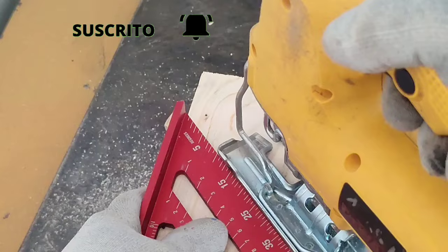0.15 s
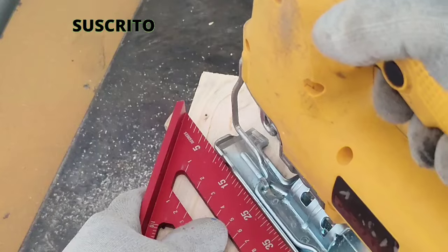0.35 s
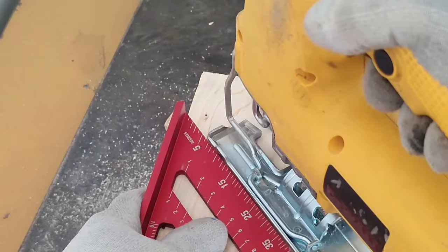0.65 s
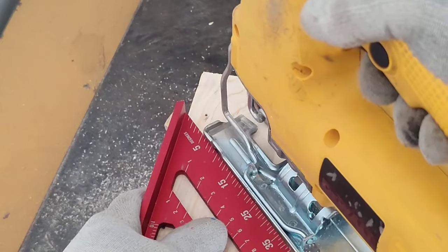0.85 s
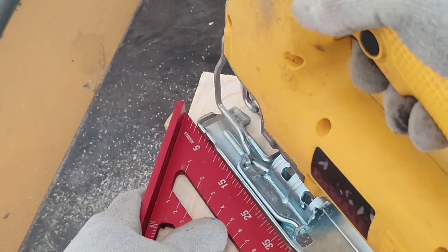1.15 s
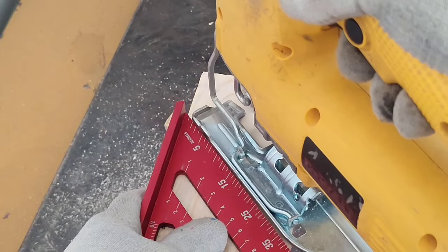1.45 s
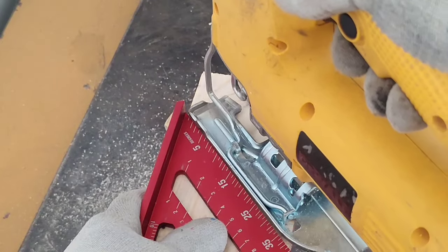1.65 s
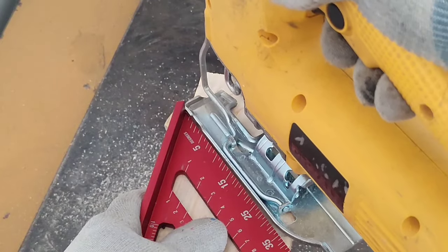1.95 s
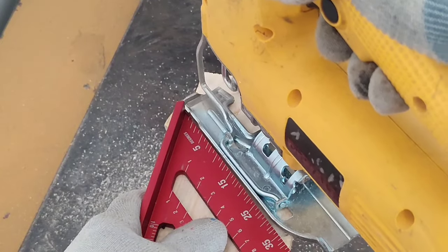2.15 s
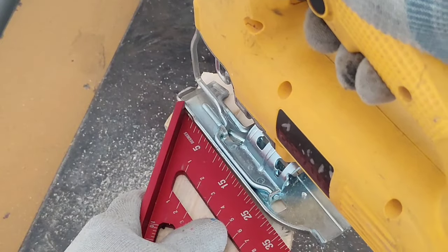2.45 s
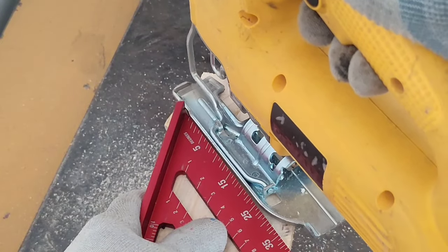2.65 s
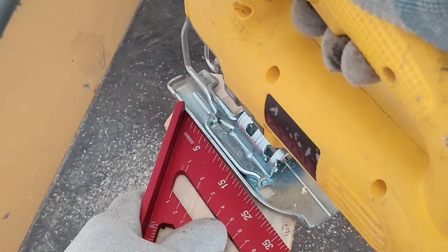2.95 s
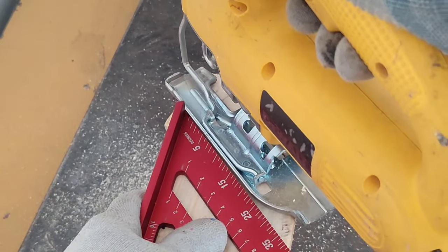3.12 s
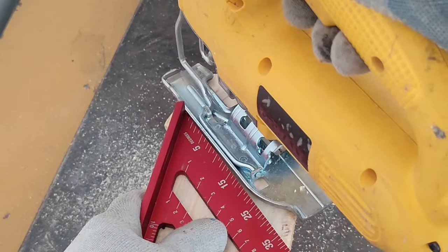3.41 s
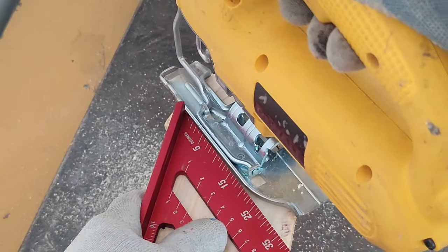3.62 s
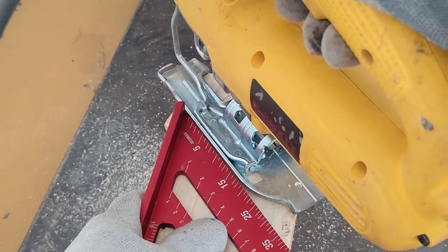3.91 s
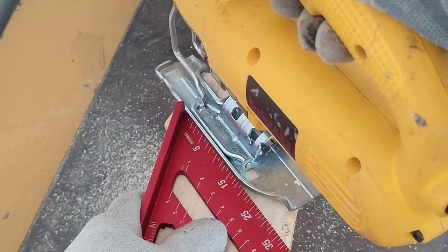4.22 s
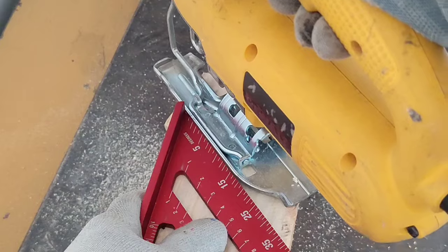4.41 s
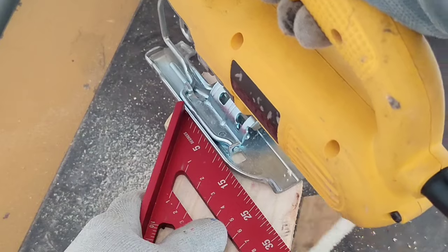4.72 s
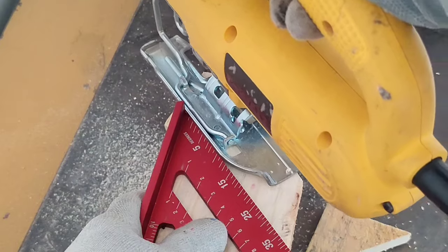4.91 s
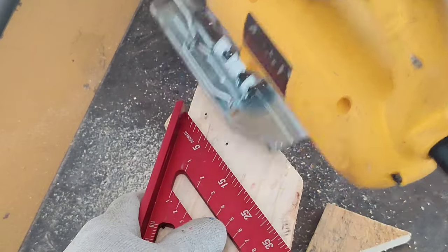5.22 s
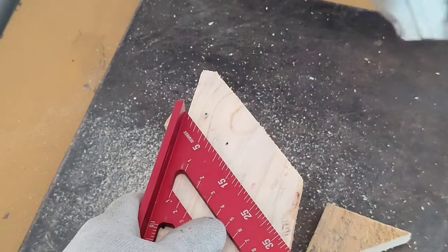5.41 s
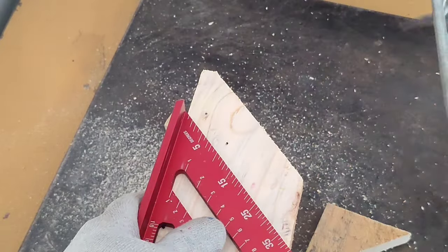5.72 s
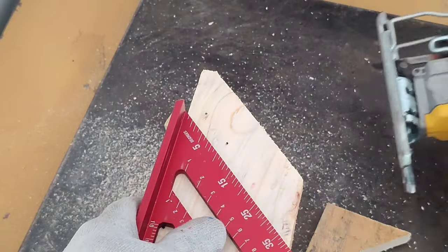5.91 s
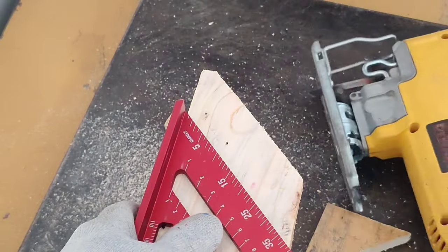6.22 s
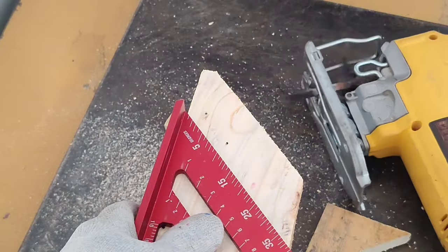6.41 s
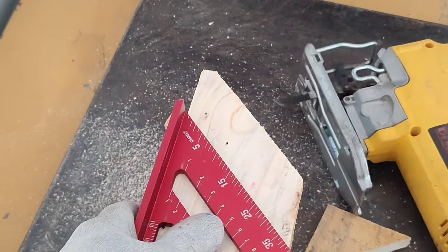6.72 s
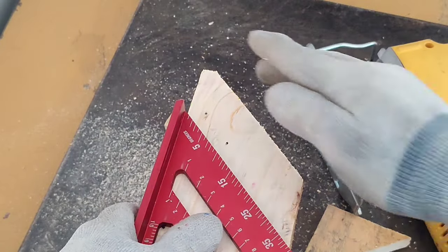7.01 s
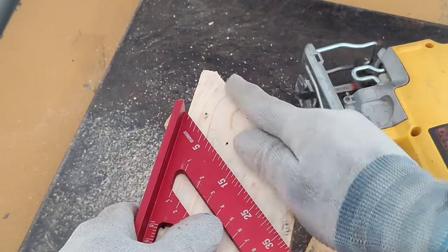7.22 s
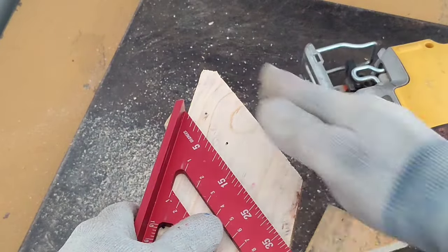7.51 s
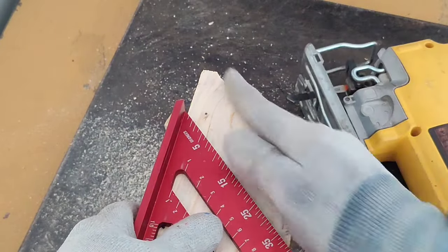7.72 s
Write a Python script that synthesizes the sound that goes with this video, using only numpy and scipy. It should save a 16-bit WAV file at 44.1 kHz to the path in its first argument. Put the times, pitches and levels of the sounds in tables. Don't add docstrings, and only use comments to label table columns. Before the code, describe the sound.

Very close to the microphone, a jigsaw tears through a wooden board with a harsh, rapid hammering buzz, motor whine, gear rattle and fan hiss. Dry snaps crowd in as the board thins. The blade breaks free, the motor is switched off and its whine slides down while moving right. The saw thumps onto the bench, its last rattle dies, and a gloved hand brushes the board in a quiet small workshop.

```python
import sys
import numpy as np
from scipy import signal
from scipy.fft import rfft, irfft, next_fast_len
from scipy.io import wavfile
from scipy.ndimage import uniform_filter1d, map_coordinates

SR = 44100
rng = np.random.default_rng(int(sys.argv[2]) if len(sys.argv) > 2 else 0)


def gain_from_db(level_db):
    decades = np.asarray(level_db, float) / 20
    return 10 ** decades


def transcribe(signal):
    frames = np.atleast_2d(signal).T
    limited = np.clip(frames, -1, 1)
    pcm = np.round(limited * 32767).astype(np.int16)
    wavfile.write(sys.argv[1], SR, pcm)


N = 346255
TIME = np.arange(N) / SR
GEAR = 9.55
SWITCH_OFF_S = 5.1


def unit(x):
    return x / np.sqrt(np.mean(x ** 2) + 1e-20)


def along(points, hz):
    f, v = np.transpose(points)
    return np.interp(np.log(hz + 1), np.log(f + 1), v)


def curves(rows):
    s, *cols = np.transpose(rows)
    return [np.interp(TIME, s, c) for c in cols]


def wobble(rate):
    knots = rng.standard_normal(int(N * rate / SR) + 4)
    return map_coordinates(knots, [np.arange(N) * rate / SR])


def filtered(x, response):
    m = next_fast_len(N + SR // 4)
    return irfft(rfft(x, m) * response(np.fft.rfftfreq(m, 1 / SR)), m)[..., :N]


def highpass(x, hz, order):
    return filtered(x, lambda f: f ** order / (f ** order + float(hz) ** order))


def resonances(modes):
    def mode(f, centre, width):
        return 1j * f * width / (centre * centre - f * f + 1j * f * width)
    return lambda f: sum((-1) ** k * gain_from_db(db) * mode(f, c, w) for k, (c, w, db) in enumerate(modes))


def ticks(turns, scatter_db):
    at = np.flatnonzero(np.diff(np.floor(turns)))
    train = np.zeros(N)
    train[at] = gain_from_db(scatter_db * rng.standard_normal(N)[:len(at)])
    return train


def ring(hz, db, width_hz, gate=1, steady=0, apart=1):
    both, left, right = [wobble(width_hz) + 1j * wobble(width_hz) for port in range(3)]
    drift = np.cumsum(width_hz * wobble(width_hz)) / SR
    both = both + steady * np.exp(1j * drift)
    carrier = gate * np.exp(2j * np.pi * np.cumsum(hz + np.zeros(N)) / SR)
    return gain_from_db(db) * unit(np.real(carrier * [both + 0.91 * apart * left, both + 0.76 * apart * right]))


def spells(rows, rest_db, fall_db_per_s):
    total = gain_from_db(rest_db)
    for start, attack, hold, db in rows:
        rise = np.clip((TIME - start) / attack, 0, 1) ** 2
        fall = gain_from_db(-fall_db_per_s * np.clip(TIME - start - attack - hold, 0, 9))
        total = total + gain_from_db(db) * rise * fall
    return 20 * np.log10(total)


# f/Hz, likeness [0-1]
ALIKE = [(100, 0.88), (300, 0.91), (600, 0.3), (1200, 0.24), (2500, 0.23), (5000, 0.33), (9000, 0.36),
         (13000, 0.17)]


def rush(spectrum, gate, patchy_db=0):
    z = signal.stft(gate * rng.standard_normal((2, N)), nperseg=1024)[2]
    field = uniform_filter1d(uniform_filter1d(rng.standard_normal(z.shape[1:]), 4, 0), 14, 1)
    pair = signal.istft(z * gain_from_db(patchy_db * unit(field)), nperseg=1024)[1][:, :N]

    def response(hz):
        turn = np.arccos(np.clip(along(ALIKE, hz), 0, 1)) / 2
        return gain_from_db(along(spectrum, hz)) * [np.cos(turn), np.sin(turn)]
    mid, side = filtered(pair, response)
    return unit(np.array([mid + side, mid - side]))


# t/s, share [0-1]
AWAY = [
    (0, 0),
    (5.15, 0),
    (5.6, 0.89),
    (7.85, 0.85),
]


def away():
    return curves(AWAY)[0]


# t/s, f/Hz
SPEED = [(0, 490.2), (.2, 496.8), (.4, 502.5), (1, 508.5), (1.6, 516), (1.8, 517.1), (2.07, 522.3),
         (2.25, 523.6), (2.5, 522.3), (2.85, 516.8), (3.1, 518.4), (3.6, 527.9), (4.2, 533.6), (4.55, 533),
         (4.8, 545.4), (5, 552.3), (5.085, 553.2)]


def shaft():
    drag_s, friction_hz = 2.8, 400
    coasting = np.clip(TIME - SWITCH_OFF_S, 0, None)
    return np.clip((curves(SPEED)[0] + friction_hz) * np.exp(-coasting / drag_s) - friction_hz, 0, None)


# t/s, level/dB
FEED = [(0, 0), (.4, -2), (.9, -2.5), (1.3, -1), (1.8, -2), (2.1, -1), (2.6, -1.5), (2.85, -1), (3.6, -1.5),
        (3.9, -8.5), (4.4, -3), (4.65, -2), (4.95, -1.5), (5.1, -5.5), (5.3, -0.5), (5.6, 3)]
# t/s,
# change level/dB, half length t/s
SNAGS = [(.41, 0.5, 0.027), (0.762, 0, .03), (0.851, 0.5, .04), (1.035, -1.5, 0.027), (1.178, -6.5, 0.014),
         (1.835, 2.5, 0.017), (1.893, 1.5, 0.024), (2.3, 0.5, 0.03), (2.455, -3.5, .03),
         (2.777, -3.5, 0.066), (3.89, 5.5, 0.013), (4, -16, 0.016), (4.078, 4.5, 0.041), (4.13, -2, 0.024),
         (4.236, -2.5, 0.019), (4.3, 3.5, 0.018), (4.412, 1, 0.032), (4.545, -4.5, 0.036),
         (4.58, 11.5, .01), (4.613, -10.5, 0.033), (4.72, 2, 0.036), (5.86, 0, 0.026),
         (6.642, 11.5, 0.0303), (7.317, -9, 0.047)]


def feed():
    return curves(FEED)[0] + sum(db * np.exp(-((TIME - s) / half) ** 2) for s, db, half in SNAGS)


# from t/s, delay as share of a stroke
BEAT_DELAYS = [(0, .06), (2.1, -.1), (2.88, .2), (3.25, -.3), (3.45, -.35), (3.59, .08), (3.655, -.4), (3.825, 0),
               (3.91, -.05), (4.02, .44), (4.125, .85), (4.25, .77), (4.36, .72)]


def beat_delay():
    s, share = np.transpose(BEAT_DELAYS)
    return share[np.searchsorted(s, TIME, side="right") - 1]


# f/Hz, level/dB per Hz
ROOM = [(120, -34), (200, -4), (373, -4.5), (454, -11), (1130, -24.5), (1320, -20), (4360, -31),
        (14200, -28.5)]
# f/Hz, level/dB per Hz
HISS = [(300, -31.5), (1500, -7), (4000, -1), (9000, 0), (12000, -11.5), (14200, -21)]


def workshop():
    return gain_from_db(-61.5) * rush(ROOM, 1) + gain_from_db(-72) * rush(HISS, 1)


# f/Hz, level/dB per Hz
DEEP = [(15, -32), (30, -3.5), (70, -2), (160, -4.5), (260, -7.5), (400, -36), (800, -120)]
# start t/s, swell t/s, hold t/s, level/dB
SHUDDERS = [(-.1, .1, 3.48, -40), (3.6, 0.094, .9, -52), (4.6, 0.11, 0.4, -42), (5.4, 0.046, 0.12, -49),
            (5.83, .03, .02, -64), (5.93, .02, .02, -60), (6.15, 0.041, 0.39, -59), (6.6, 0.034, 0.14, -45),
            (6.9, .05, .2, -56), (7.2, 0.12, 0.11, -59), (7.7, 0.17, .1, -68)]


def bench_rumble():
    level_db = spells(SHUDDERS, -72, 70) - 1.0 + 1.4 * wobble(10) + 0.9 * wobble(2.27)
    return gain_from_db(level_db) * rush(DEEP, 1)


# f/Hz, level/dB per Hz
CLOTH = [(59, -30.5), (100, -9), (168, -31), (249, -12), (500, -16), (845, -21), (1110, -12.5), (3250, -22),
         (8970, -27), (11500, -27.5), (12800, -27), (14200, -39)]
# start t/s, swell t/s, hold t/s, level/dB
GLOVE = [
    (7.33, .05, .07, -39),
    (7.47, .03, .04, -57),
    (7.72, .04, 0, -58),
    (7.762, .002, .2, -44.5),
]


def gloved_hand():
    return gain_from_db(spells(GLOVE, -76, 200)) * rush(CLOTH, gain_from_db(1.9 * wobble(260)))


# t/s, peak level/dB
LAID = [
    (6.621, -20),
    (6.639, -28),
    (6.687, -30),
    (6.75, -40),
]
# f/Hz, level/dB, time to fall 60 dB t/s
BENCH = [(67.3, -4.5, 1), (122.6, -6, 0.42), (204, -12.5, 0.53), (342, -10, 0.27), (450, -13, .15),
         (556, -7, 0.12), (960, -17, 0.13), (1100, -4, 0.55), (1330, -6, 0.28)]


def laid_down():
    out, t = np.zeros(N + SR), np.arange(SR) / SR
    for s, db in LAID:
        modes = sum(gain_from_db(level + rng.normal(0, 2.7) - 60 * t / t60) * np.sin(2 * np.pi * hz * t)
                    for hz, level, t60 in BENCH)
        puff = 3 * uniform_filter1d(rng.standard_normal(SR), 20) * gain_from_db(-60 * t / 0.17)
        out[round(s * SR):][:SR] += gain_from_db(db - 8.0) * (modes + puff) * (1 - np.exp(-t / 0.0017))
    return out[:N]


# start t/s, swell t/s, hold t/s, level/dB
ONCE = [
    (.05, .2, 0.038, -62),
    (.9, .7, 1.75, -49.5),
]
# start t/s, swell t/s, hold t/s, level/dB
TWICE = [(-.1, 0.075, 2.3, -39.5), (2.3, 0.051, .95, -43), (3.35, .06, .55, -54), (4, .06, 0.53, -48.5),
         (4.5, 0.24, 0.09, -37.5), (4.75, 0.22, 0.24, -27.5), (5.36, 0.035, .04, -43.5)]


def shake(speed):
    off = round(SWITCH_OFF_S * SR)
    strokes = np.cumsum(np.where(np.arange(N) < off, speed, speed[off])) / SR / GEAR
    once_db, twice_db = spells(ONCE, -53.5, 25), spells(TWICE, -59, 170)
    once = gain_from_db(once_db + 3 * wobble(11)) * np.sin(2 * np.pi * (strokes + 0.088 * wobble(12)))
    twice = gain_from_db(twice_db + 1.5 * wobble(15)) * np.sin(2 * np.pi * (2 * strokes + 0.093 * wobble(12)))
    return 1.32 * (once + twice) * gain_from_db(-60 * np.clip(TIME - 5.4, 0, None))


# order, start t/s, swell t/s, hold t/s, level/dB
DRONES = [(4, -.1, .1, .38, -36), (4, .4, .1, 1.5, -46), (5, .9, .3, 1.2, -43), (5, 2.7, .1, .45, -41),
          (6, -.1, .1, .5, -37), (6, .6, .1, .5, -46), (8, .2, .1, .4, -44), (8, 1.7, .1, .35, -45),
          (8, 3.4, .1, .25, -44), (9, 2.3, .2, .7, -39), (11, .1, .1, .6, -37), (11, 1., .1, .9, -36.5),
          (11, 2.7, .1, .3, -42), (13, 2.6, .1, .4, -42), (10, 3.1, .1, 1.3, -40)]


def drones(strokes):
    total = 0
    for order, *spell in DRONES:
        level = gain_from_db(spells([spell], -90, 90) + 2 * wobble(9))
        total = total + level * np.sin(2 * np.pi * (order * strokes + .05 * wobble(14)))
    return 1.4 * total


def slowing(speed):
    return np.log10(speed / 520 + .03)


def halt_db():
    return -200 * np.clip(TIME - 7.43, 0, None)


def freed():
    return np.clip((TIME - 4.62) / 0.055, 0, 1)


def flutter_db():
    return 1.6 * away() * wobble(16)


def clear_db():
    return 3.5 * away()


# order, level/dB, line width f/Hz
WHINE = [(11.87, -42, -7.5), (15.52, -38.5, 60.5), (23.8, -41.5, 159.5)]


def armature(speed, turns):
    def tone(order, db, hz):
        return 1.74 * gain_from_db(db) * np.sin(2 * np.pi * (order * turns + np.cumsum(hz * wobble(300)) / SR))
    hum_db = -49 + 18 * slowing(speed)
    hum_db += 8 * np.exp(-((speed - 340) / 45) ** 2)
    hum_db -= np.clip((295 - speed) / 5, 0, 9)
    tones = tone(1, hum_db - 3 + 2.5 * wobble(20), 14 - 5 * away())
    effort_db = 40 * np.log10(speed / 520 + .01)
    tones += sum(tone(order, db + effort_db + 3 * wobble(23), hz) for order, db, hz in WHINE)
    return tones * gain_from_db(halt_db())


# t/s, tone level/dB at full speed
VENTS = [(0, -28), (.45, -21), (.8, -30.5), (1.15, -24), (1.5, -21.5), (2, -24), (2.6, -27.5), (3.4, -27),
         (3.65, -32.5), (4.4, -29.5), (5.05, -25.5), (5.2, -24), (5.45, -21.5), (5.57, -20), (5.63, -34)]


def fan_whine(speed, strokes):
    level_db = curves(VENTS)[0] + 40 * slowing(speed) + 0.61 * wobble(2.7) + flutter_db()
    pitch_hz = 17 * speed + 70 * away() * wobble(50)
    load = gain_from_db(2.2 * np.cos(2 * np.pi * strokes))
    return ring(pitch_hz, level_db - 1.5 + clear_db(), 40, load, steady=1.5, apart=2)


# start t/s, swell t/s, hold t/s, level/dB
MESH = [(-.05, .05, .2, -25.5), (.2, .04, .15, -31), (3.4, .1, .9, -35), (4.66, .05, .15, -32),
        (5.28, .06, .08, -28), (5.44, .05, .07, -31), (5.57, .03, .05, -26), (5.7, .04, .08, -31),
        (5.81, .03, .03, -21), (5.92, .03, .03, -24), (6.02, .04, .3, -27)]


def pinion(speed, strokes):
    level_db = spells(MESH, -53, 97) + 37 * slowing(speed) + 1.5 * wobble(7.3) + flutter_db()
    pitch_hz = 8 * speed + 40 * away() * wobble(30)
    load = gain_from_db(5 * np.cos(2 * np.pi * strokes + 2))
    return ring(pitch_hz, level_db + clear_db(), 120, load, steady=1)


# f/Hz, level/dB per Hz
RATTLE = [(180, -29.5), (300, -21.5), (362, -15), (437, -19.5), (566, -16), (876, -10), (1070, -4),
          (1220, -8), (1560, -4.5), (2410, -1.5), (2680, -3.5), (2910, -5), (3860, -11.5), (5000, -13.5),
          (6500, -60), (11000, -120)]


def gear_rattle(speed, lumps):
    level_db = -19.5 + 0.33 * feed() + 15.7 * slowing(speed) - 0.5 * freed() + halt_db()
    return gain_from_db(level_db) * rush(RATTLE, lumps, patchy_db=2.0)


# f/Hz, level/dB per Hz
AIR = [(1760, -20.5), (3000, -2.5), (4340, -1), (5450, -4.5), (5970, -3), (6580, -2), (7590, 2.5),
       (8530, -7), (9100, -6), (9590, -8.5), (9840, -4.5), (13000, -5), (14200, -10)]


def fan_air(speed):
    level_db = -25 + 0.34 * feed() + 24.3 * slowing(speed) + 2.5 * freed() + halt_db()
    level_db += 3.5 * np.exp(-((TIME - 5.46) / 0.082) ** 2)
    gusts = gain_from_db(0.18 * wobble(12) + 1.3 * wobble(40) + 1.26 * wobble(500))
    air = gain_from_db(level_db + 7.0) * rush(AIR, gusts, patchy_db=1.5)
    top = highpass(air, 7900, 4)
    return air - top + top * gain_from_db(2.7 * slowing(speed))


# start t/s, swell t/s, hold t/s, level/dB
SHELL_RINGS = [
    (5.3, 0.073, 0.044, -3),
    (5.9, 0.53, .85, -16.5),
    (7.05, 0.13, .1, -45),
    (7.3, 0.04, 0.086, -36),
]
# start t/s, swell t/s, hold t/s, level/dB
BENCH_RINGS = [
    (6.62, 0.026, 0.21, -36),
    (7.1, 0.043, .04, -38),
]
# start t/s, swell t/s, hold t/s, level/dB
CASE_RINGS = [
    (5.7, .1, .2, -33),
    (6.65, .1, 0.22, -37),
    (7.15, 0.049, 0.16, -55),
]


def shell(speed, lumps):
    pitch_hz = 2250 + 0.9 * np.clip(speed - 100, 0, 250)
    shell_db = spells(SHELL_RINGS, -74, 120) - 14.0 + halt_db()
    rings = np.clip(1.7 - speed / 330, 0, 1) * ring(pitch_hz + 40 * wobble(25), shell_db, 750, lumps, steady=.4)
    seated = np.arange(N) > 6.62 * SR
    rings += seated * ring(1065, spells(BENCH_RINGS, -79, 90) - 4.0 + halt_db(), 90)
    case_db = spells(CASE_RINGS, -72.5, 80) + halt_db()
    return rings + ring(3200 + 90 * wobble(6.5), case_db, 450, lumps)


def motor_noise(speed, strokes):
    lumps = gain_from_db(1.0 * np.cos(4 * np.pi * strokes) * speed / 520 + 0.85 * wobble(30) + 1.7 * wobble(400))
    noise = gear_rattle(speed, lumps) + fan_air(speed) + shell(speed, lumps)
    noise += pinion(speed, strokes) + fan_whine(speed, strokes)
    return highpass(noise, 214, 6)


# t/s, peak level/dB
CRACKS = [(2.3017, -8), (2.3372, -8), (2.4101, -6), (2.5372, -8), (2.5555, -8), (2.5739, -9), (2.5927, -9),
          (2.6299, -7), (2.6486, -9), (2.7026, -8), (2.72, -10), (2.7648, -11), (2.7847, -10), (2.8314, -9),
          (2.8527, -10), (2.9116, -8), (2.9292, -9), (2.9531, -9), (3.0794, -10), (3.1555, -10),
          (3.1693, -10), (3.1881, -8), (3.3251, -10), (3.393, -9), (3.5243, -6), (3.5428, -8), (3.5792, -7),
          (3.6047, -7), (3.6229, -7), (3.6411, -8), (3.6683, -6), (3.7045, -7), (3.7232, -8), (3.758, -7),
          (3.776, -10), (3.7944, -11), (3.8128, -7), (3.8379, -12), (3.874, -9), (3.8921, -7), (3.9268, -9),
          (3.9453, -9), (3.9586, -9), (4.0447, -8), (4.0593, -9), (4.0796, -9), (4.097, -10), (4.1584, -10),
          (4.1765, -10), (4.1942, -11), (4.3004, -8), (4.389, -10), (4.4718, -8), (4.5722, -8)]
# f/Hz, width f/Hz, level/dB
CRACKED = [(540, 150, 0), (1050, 400, -8), (1530, 500, 0), (2900, 800, -4), (4250, 1200, -8)]


def cracks():
    s, db = np.transpose(CRACKS)
    train = np.zeros(N)
    train[np.round(s * SR).astype(int)] = gain_from_db(db - 1)
    snap = filtered(train, resonances(CRACKED))
    return -snap * train.max() / np.abs(snap).max()


# start t/s, swell t/s, hold t/s, level/dB
KNOCKS = [
    (0, 0.34, 0.11, -35),
    (2.6, 0.36, 1, -63.5),
    (4.9, .3, .02, -54),
]
# f/Hz, width f/Hz, level/dB
BOARD = [(553, 90, -9), (810, 60, -5.5), (992, 58, -3.5), (1247, 65, 0.5), (1540, 140, -5),
         (2095, 170, -3.5), (2860, 125, -3), (4286, 200, -5.5)]
# start t/s, swell t/s, hold t/s, level/dB
SLAPS = [
    (2.4, 0.3, .5, -35.5),
    (3.1, 0.15, 1.22, -34.5),
    (4.95, 0.079, 0.11, -35.5),
]
# f/Hz, width f/Hz, level/dB
SLAPPED = [(530, 130, 4), (1520, 400, -5), (330, 60, -6), (2850, 500, -10)]
# start t/s, swell t/s, hold t/s, level/dB
THUMPS = [
    (0, 0.051, 0.22, -39),
    (.5, 0.098, 2.57, -43),
    (2.8, 0.1, .15, -45.5),
    (3.2, .2, 1.2, -58.5),
]
# f/Hz, width f/Hz, level/dB
BENCH_LOW = [(205, 210, 4), (274.3, 74, 16), (419, 51, 3.5)]


def blade_knock(strokes):
    blows = ticks(strokes + 0.0086 * wobble(40), 1.0)
    blows += 1.07 * ticks(strokes + .47 + 0.0072 * wobble(40), 3.9)
    knock = gain_from_db(spells(KNOCKS, -28, 85) + 2) * unit(filtered(blows, resonances(BOARD)))
    slaps = ticks(strokes + .005 * wobble(30), 2)
    slap_db = spells(SLAPS, -48, 300) + .4 * feed()
    slap = gain_from_db(slap_db) * unit(filtered(slaps, resonances(SLAPPED)))
    even = ticks(strokes, 1) + .6 * ticks(strokes + .5, 2)
    low = resonances(BENCH_LOW)
    thump = gain_from_db(spells(THUMPS, -49.0, 29) - 2.0) * unit(filtered(even, lambda f: low(f) ** 2))
    return knock + slap + thump


# t/s, pitch f/Hz, ring level/dB
KERF = [(0, 1550, -23), (.6, 1549, -22.5), (.97, 1497, -19), (1.2, 1522, -22.5), (1.46, 1524, -29),
        (1.78, 1485, -27.5), (2.14, 1466, -21), (2.4, 1450, -22), (2.76, 1460, -26), (3.25, 1498, -26.5),
        (3.7, 1534, -21), (4.5, 1538, -25.5), (4.66, 1593, -43), (5.2, 1600, -36)]
# start t/s, swell t/s, hold t/s, level/dB
LOWER = [
    (0, 0.16, 0.22, -21),
    (1.9, 0.088, 0.51, -18),
    (2.85, 0.063, 0.26, -20.5),
    (4.9, 0.16, .02, -36),
]
# start t/s, swell t/s, hold t/s, level/dB
SHOE = [
    (1.9, 0.14, 0.3, -19.5),
    (2.85, 0.48, 0.26, -19.5),
    (4.15, 0.24, 0.15, -13),
    (4.55, 0.047, 0.32, -40),
]
# start t/s, swell t/s, hold t/s, level/dB
UPPER = [
    (.5, 0.14, 0.14, -24),
    (.8, .05, 0.11, -26),
    (1.15, 0.11, 0.24, -25.5),
    (1.6, 0.075, .15, -31),
    (4.25, .1, .2, -29),
]
# start t/s, swell t/s, hold t/s, level/dB
OFFCUT = [
    (1.76, 0.021, 0.054, -28.5),
    (2.5, 0.085, 0.22, -32),
]
# t/s, f/Hz
OFFCUT_HZ = [
    (1.8, 900),
    (2.6, 800),
]
# start t/s, swell t/s, hold t/s, level/dB
GUARD = [
    (.26, 0.045, .1, -27.5),
    (.49, 0.017, .04, -30.5),
]


def board_rings(bite):
    (plate_hz, plate_db), feed_db = curves(KERF), feed()
    plate_db = plate_db + 0.65 * feed_db + .7 * wobble(8)
    rings = ring(plate_hz + 30 * wobble(6), plate_db, 260, bite ** 1.7, steady=1.4)
    rings += ring(1255, spells(LOWER, -46.5, 90) - 7.0, 60, bite)
    rings += ring(2850, spells(SHOE, -46.5, 150) - 11.0, 130, bite ** 2.4, steady=.8)
    upper_db = spells(UPPER, -44, 90) + feed_db
    rings += ring(2100 + 40 * wobble(4), upper_db, 240, bite ** 2.4, steady=0.41)
    rings += ring(curves(OFFCUT_HZ)[0], spells(OFFCUT, -58.5, 160), 50, bite)
    return rings + ring(2510, spells(GUARD, -51, 150), 90, bite)


# f/Hz, level/dB per Hz
RIP = [(180, -41.5), (300, -18.5), (395, -19.5), (426, -11), (548, -6.5), (628, -10), (860, -8),
       (1510, 0.5), (1890, -3.5), (2900, -24.5), (3170, -10), (4220, -9.5), (6000, -14), (7800, -46),
       (13200, -120)]


def blade_rip(strokes):
    stroke_db = 1.7 * np.cos(2 * np.pi * strokes) + 2.1 * np.cos(4 * np.pi * strokes + 1)
    bite = gain_from_db(stroke_db + 0.35 * wobble(12) + 0.72 * wobble(400))
    rip = gain_from_db(-17.5 + feed() + .7 * wobble(9) - 3.5) * rush(RIP, bite, patchy_db=2)
    return rip + board_rings(bite)


# f/Hz, time to fall 60 dB t/s
WALLS = [(100, 0.94), (1000, 0.21), (8000, 0.057)]


def walls(x):
    hz, t, z = signal.stft(rng.standard_normal((2, SR // 3)), SR, nperseg=256)
    tail = signal.istft(z * gain_from_db(-60 * t / along(WALLS, hz)[:, None]), SR, nperseg=256)[1]
    return signal.fftconvolve(np.pad(x, (300, 0))[None], tail / np.linalg.norm(tail[0]), axes=1)[:, :N]


def placed(x, lag_s, pan_db):
    sides = np.array([[1], [-1]])

    def response(hz):
        turn = np.pi * hz * lag_s * np.exp(-(hz / 7500) ** 4)
        return gain_from_db(sides * along(pan_db, hz) / 2) * np.exp(-1j * sides * turn)
    return filtered(x, response)


# f/Hz, left over right level/dB
LEANS = [(100, 1), (300, 1.5), (600, 0.5), (1200, 1.5), (2200, 0.5), (4500, -2.5), (8000, 1.2), (13000, 0)]


def scene():
    speed = shaft()
    turns = np.cumsum(speed) / SR
    strokes = turns / GEAR
    beat_strokes = strokes - beat_delay()
    still = np.clip(1 - 1.12 * away(), 0, 1)
    near = still * blade_knock(beat_strokes) + armature(speed, turns) + cracks() + drones(strokes)
    echo = highpass(walls(near), 750, 4)
    saw = still * blade_rip(beat_strokes) + motor_noise(speed, strokes) + near + 0.5 * echo
    saw = saw + gain_from_db([[1.2], [-1.2]]) * (shake(speed) + laid_down())
    at_board = placed(saw * (1 - away()), -0.000058, pan_db=LEANS)
    carried = placed(saw * away(), 0.000099, pan_db=[(1000, -3.0)])
    return at_board + carried + gloved_hand() + bench_rumble() + workshop()


# f/Hz, share of middle [0-1], share of side [0-1]
DROPPED = [(5500, 0, 0), (6800, .01, .02), (7300, .02, .3), (8900, .25, .33), (10500, .12, .33),
           (13000, .25, .33), (14000, .42, .5)]
# f/Hz, share of the local level [0-1]
DEAD = [(4000, 0.25), (6000, .4), (8000, 0.89), (12000, 0.98)]


def thinned_treble(x):
    hz, _, z = signal.stft([x[0] + x[1], x[0] - x[1]], SR, nperseg=2048)

    def cells(bins, frames):
        luck = rng.random(z.shape[1:]).repeat(bins, axis=0).repeat(frames, axis=1)
        return luck[:len(hz), :z.shape[2]]
    luck = np.array([cells(18, 2), cells(30, 3)])
    share = np.array([along([(row[0], row[k]) for row in DROPPED], hz) for k in (1, 2)])
    log_size = np.log(np.abs(z) + 1e-12)
    local = 1.3 * np.exp(uniform_filter1d(log_size, size=48, axis=1))
    kept = (luck >= share[:, :, None]) & (np.abs(z) >= along(DEAD, hz)[:, None] * local)
    kept |= np.abs(z) > 3.5 * local
    mid, side = signal.istft(z * kept, SR, nperseg=2048)[1][:, :N] / 2
    return np.array([mid + side, mid - side])


def band_limit(x):
    return signal.sosfilt(signal.butter(12, 14290, fs=SR, output="sos"), x)


def record(dry):
    rounded = dry / (1 + np.abs(dry) ** 8) ** (1 / 8)
    mix = thinned_treble(rounded)
    return band_limit(mix)


dry = scene()
out = record(dry)
transcribe(out)
```